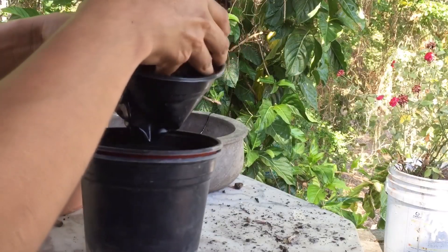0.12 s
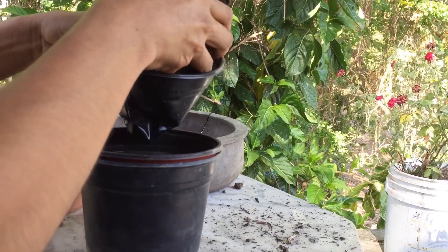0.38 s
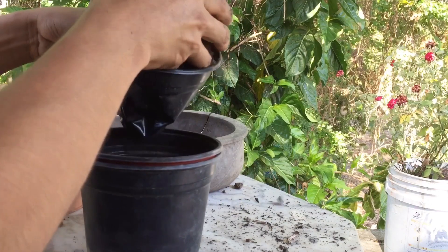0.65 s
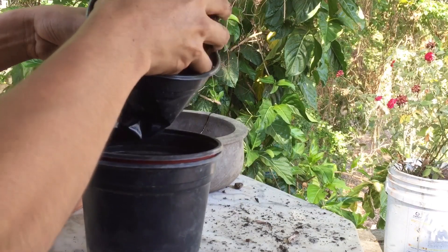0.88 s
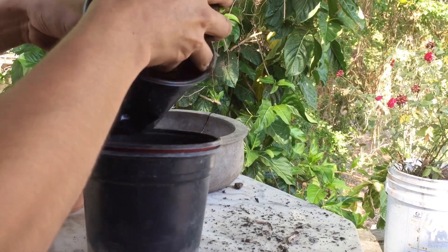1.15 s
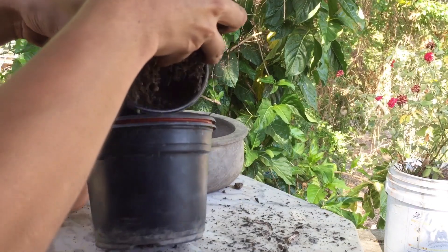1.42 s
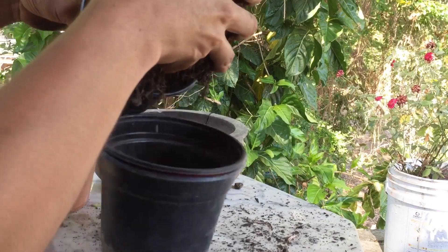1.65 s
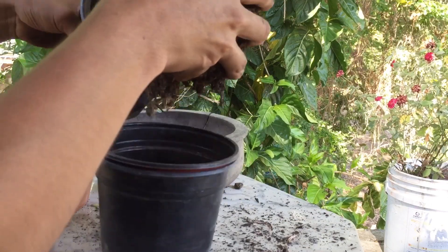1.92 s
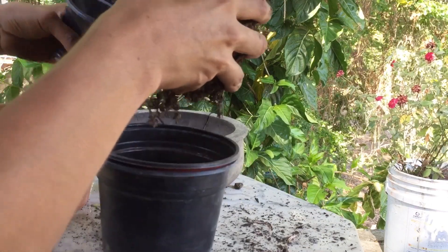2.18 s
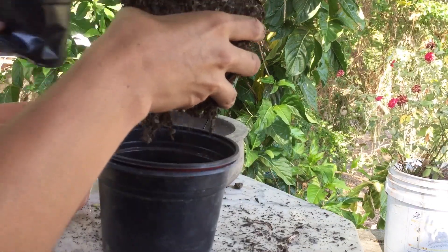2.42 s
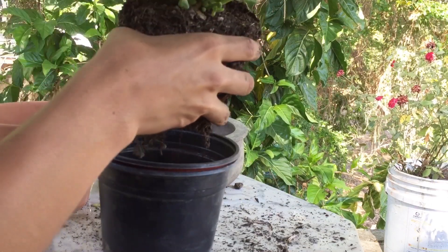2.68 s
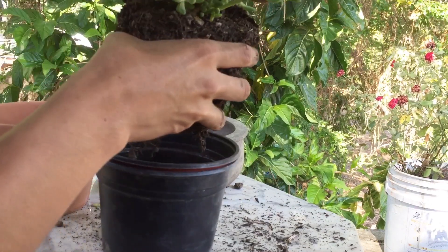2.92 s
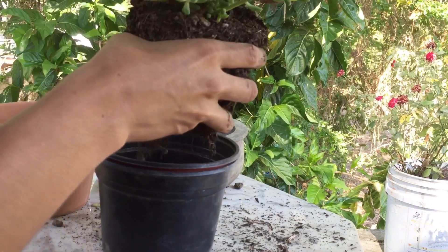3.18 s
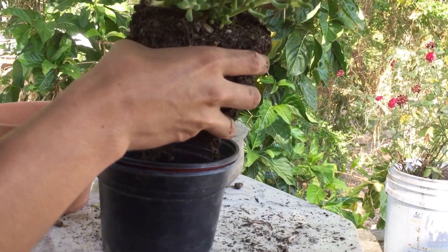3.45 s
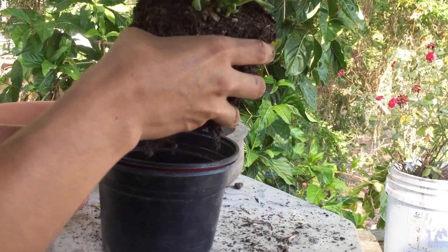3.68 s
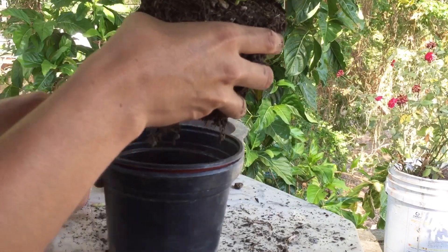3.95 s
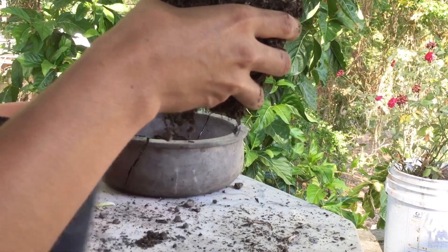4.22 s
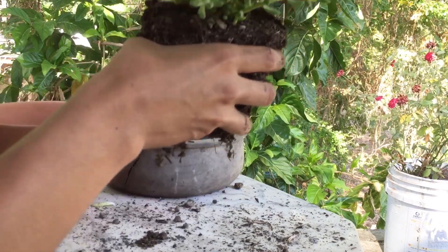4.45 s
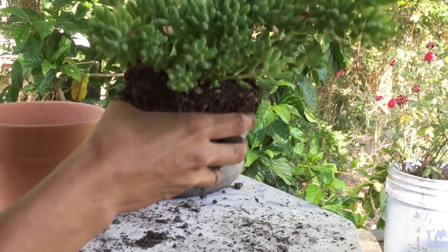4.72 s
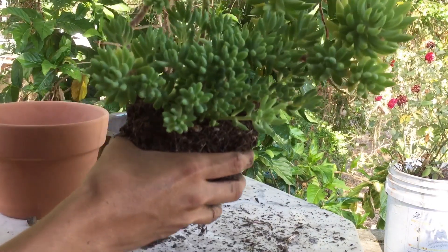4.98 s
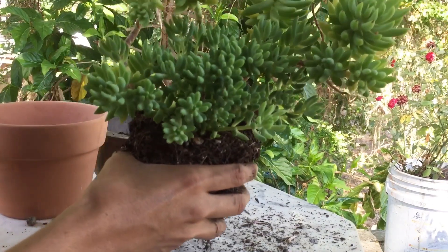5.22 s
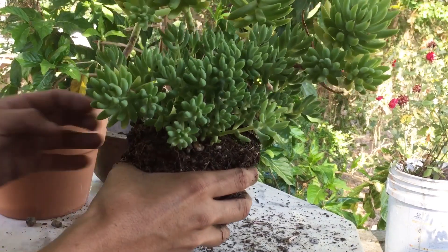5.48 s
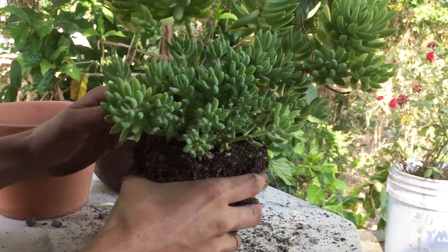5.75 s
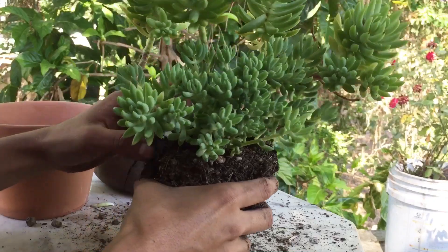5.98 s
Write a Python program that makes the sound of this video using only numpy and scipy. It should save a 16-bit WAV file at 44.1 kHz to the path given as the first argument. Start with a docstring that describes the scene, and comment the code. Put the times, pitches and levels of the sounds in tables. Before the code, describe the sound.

Close gritty soil rustle with sharp plastic pops, one loud crack, later a heavy pot thud, dragging, and soft clay knocks in a breezy garden.

```python
"""Soil and roots rustle at once, under a light breeze on the microphone and a quiet garden hiss.
Milliseconds later a thin plastic pot snaps: hands outdoors work a root ball out of it over a table.
Pots, one of them clay, knock and drag. Rustle, snaps and contacts are runs of tiny slips that ring
the modes of a body; breeze and garden are shaped noise, with single puffs of wind."""
import sys
import numpy as np
from scipy import signal
from scipy.fft import rfft, irfft
from scipy.io import wavfile
from scipy.ndimage import uniform_filter1d

SR = 44100
rng = np.random.default_rng(int(sys.argv[2]) if len(sys.argv) > 2 else 0)


def undo_db(level):
    """Turn decibels back into plain size, where 20 dB means ten times bigger."""
    steps = np.asarray(level, float) / 20
    return 10 ** steps


def unload_audio(sound):
    """Save the sound as a 16-bit wav file, at the path given as the first command line argument."""
    columns = np.transpose(np.atleast_2d(sound))
    # keep every value between -1 and 1, then stretch to whole-number steps
    steps = np.round(np.clip(columns, -1, 1) * 32767)
    wavfile.write(sys.argv[1], SR, steps.astype(np.int16))


N = 269892  # length [samples]


def in_time(rows):
    """Draw a table of (time [s], level [dB]) as one signal."""
    s, db = np.transpose(rows)
    return np.interp(np.arange(N) / SR, s, db)


def rms_one(x):
    """Scale to unit rms."""
    return x / np.sqrt(np.mean(x ** 2) + 1e-20)


def drift(rate_hz):
    """Slow random wander of unit rms: noise through two equal one-pole low-passes."""
    r = np.exp(-2 * np.pi * rate_hz / SR)
    settled = signal.lfilter([1], [1, -2 * r, r * r], rng.standard_normal(N + SR))[SR:]
    return rms_one(settled)


def band(x, low_hz, high_hz):
    """Band-pass."""
    return signal.sosfilt(signal.butter(2, [low_hz, high_hz], "band", fs=SR, output="sos"), x)


def ring(force, hz, t60):
    """One mode driven by a force, falling 60 dB in t60 seconds."""
    r, w = undo_db(-60 / (t60 * SR)), 2 * np.pi * min(hz, SR / 2.2) / SR
    return signal.lfilter([0, np.sin(w)], [1, -2 * r * np.cos(w), r * r], force)


def add(out, s, x):
    """Mix a short sound in at a moment."""
    i = max(round(s * SR), 0)
    out[i:i + len(x)] += x[:N - i]


# low rumble of the gusts on the microphone: (time [s], rms level [dB])
GUSTS = [(0.0, -59.5), (0.83, -56), (1.28, -55.5), (1.7, -60.5), (1.92, -66), (2.57, -67), (3.2, -58),
         (3.32, -57.5), (4.23, -61.5), (4.55, -54.5), (4.84, -62), (5.03, -72.5), (5.35, -72.5),
         (6.12, -60.5)]
# murmur of smaller, faster eddies: (time [s], rms level [dB])
SMALL_EDDIES = [(0.0, -65), (0.12, -64), (0.46, -61), (1.07, -59), (1.19, -51.5), (1.4, -57), (1.92, -60),
                (2.16, -60), (2.42, -55), (2.54, -61.5), (3.17, -62), (3.46, -65), (3.72, -65.5),
                (3.95, -58), (4.07, -57.5), (4.43, -52.5), (4.55, -65), (4.89, -62), (5.01, -57.5),
                (5.51, -69), (5.81, -54.5), (6.12, -58)]
# single eddies striking the microphone: (time [s], approximate peak [dB])
SINGLE_PUFFS = [(0.552, -37), (3.235, -39.5), (3.858, -39.5), (4.377, -37), (4.488, -31), (4.547, -31),
                (4.624, -40), (5.063, -44)]


def breeze():
    """Lumpy eddies at the microphone port; single puffs ring its low resonance."""
    rumble = rms_one(band(rng.standard_normal(N), 53.0, 73.2) * undo_db(2.4 * drift(3.8)))
    # each size of eddy comes and goes by itself, so the murmur wanders in pitch
    murmur = 0
    for hz in np.geomspace(140.0, 340.0, 6):
        eddy = rms_one(ring(rng.standard_normal(N), hz, 18 / hz))
        murmur = murmur + eddy * undo_db(7 * drift(4) - 3.0 * np.log2(hz / 150))
    push = np.zeros(N)
    for s, db in SINGLE_PUFFS:
        add(push, s, undo_db(db) * np.hanning(260) / 100)
    puffs = ring(push, 66, .08)
    return undo_db(in_time(GUSTS)) * rumble + undo_db(in_time(SMALL_EDDIES)) * rms_one(murmur) + puffs


# colour of the garden hiss: (frequency [Hz], relative level per Hz [dB])
GARDEN_COLOUR = [(18, -40.5), (30, -0.5), (76, 7), (200, -4.5), (455, -10), (625, -2.5), (752, -9),
                 (1030, -8.5), (3970, -22), (4900, -22), (8990, -26.5), (15200, -29), (16500, -46.5)]
GARDEN_DB = -61  # rms


def garden():
    """Distant leaves, traffic and microphone hiss: steady coloured noise."""
    hz, db = np.transpose(GARDEN_COLOUR)
    colour = undo_db(np.interp(np.log(np.fft.rfftfreq(N, 1 / SR) + 1), np.log(hz), db))
    return undo_db(GARDEN_DB) * rms_one(irfft(rfft(rng.standard_normal(N)) * colour, N))


# soil and roots rub in strokes:
# (start time [s], length [s], starting level [dB], grittiness moved from dull to bright [dB])
RUB_STROKES = [(0.0, 0.16, -54.5, -3), (0.184, 0.13, -66.5, 0), (0.261, 0.17, -67, 4.5),
               (0.438, 0.041, -76, 6), (0.494, 0.18, -60.5, -1), (0.679, 0.22, -60, -5.5),
               (0.923, 0.32, -63, -2), (1.17, 0.18, -52.5, -5), (1.349, 0.29, -55.5, 1),
               (1.647, 0.15, -58, -5), (1.817, 0.16, -54, -2), (2.027, 0.085, -59.5, -4),
               (2.166, 0.6, -76.5, 6), (2.462, 0.12, -63, 6), (2.566, 0.12, -60, 4),
               (2.721, 0.12, -63.5, -4), (2.912, 0.6, -80, 9), (3.428, 0.061, -58, -5),
               (3.523, 0.12, -52.5, -5.5), (3.642, 0.053, -73, 1), (3.742, 0.18, -79.5, 7),
               (4.038, 0.2, -57, -9), (4.249, 0.12, -62, -2), (4.39, 0.44, -77, 0),
               (4.861, 0.092, -62.5, -11), (4.972, 0.52, -75.5, -10), (5.494, 0.25, -67, -7),
               (5.763, 0.43, -82, 7.5)]
STROKE_ATTACK_S, STROKE_RELEASE_S, STROKE_SWELL_DB_PER_S = 0.0019, 0.011, 7


def strokes(grit_share):
    """Each stroke sets in, swells a little and dies away; grit moves a part up or down."""
    t, out = np.arange(N) / SR, np.zeros(N)
    for s, length, db, grit_db in RUB_STROKES:
        i, j = round(max(s, 0) * SR), round((s + length + .2) * SR)
        since = t[i:j] - s
        attack = np.clip(since / STROKE_ATTACK_S, 0, 1)
        release = np.exp(-np.maximum(since - length, 0) / STROKE_RELEASE_S)
        level_db = db + grit_share * grit_db + STROKE_SWELL_DB_PER_S * since
        out[i:j] += attack * release * undo_db(level_db)
    return out


# modes of the thin wall in hollow, middle and bright groups, each row:
# (frequency [Hz], relative level [dB], t60 before the fingers damp it [s])
WALL_MODES = [
    [(659, 3.5, 0.15), (903, -1, 0.05), (1100, 1, 0.07)],
    [(1500, 3.5, 0.023), (1900, 8.5, 0.078), (2453, 17, 0.0071), (3075, 11.5, 0.035), (3820, 13.5, 0.012),
     (4300, 3, 0.024)],
    [(5730, 1, 0.0015), (7030, -7, 0.0023), (8750, -5.5, 0.0029), (9530, -16.5, 0.0097),
     (11320, -13.5, 0.01), (13120, -8, 0.0015), (13700, -9.5, 0.0013)],
]
# fingers on the wall cut the rings short, one entry a group: (longest t60 [s])
LONGEST_RINGS = [.035, .011, .006]
RUSTLE_DULL_DB, RUSTLE_BRIGHT_DB = -9.5, -3  # against the middle part, before grit
BEND_SPREAD = .09  # share by which a bent wall shifts a mode up or down


def rustle(per_s=2000, size_db=5.0, clump_db=3.3, smooth=.3, shared_per_s=140):
    """Crumbs slip in clumps over a faint rub and ring wall modes, each hopping among three bent pitches."""
    clumps, out = drift(29), 0
    # larger crumbs tick every mode at once
    shared = rng.random(N) < shared_per_s * undo_db(clump_db * clumps) / SR
    levels = [undo_db(RUSTLE_DULL_DB) * strokes(-0.86), strokes(0), undo_db(RUSTLE_BRIGHT_DB) * strokes(0.49)]
    for modes, level, low_hz, longest in zip(WALL_MODES, levels, [380, 1100, 4200], LONGEST_RINGS):
        local_db = clump_db * np.clip(1.5 * clumps + 0.67 * drift(45), -2, 2)
        rung = 0
        for hz, db, t60 in modes:
            born = rng.random(N) < per_s * undo_db(local_db) / SR
            crumb_size = undo_db(size_db * np.minimum(rng.exponential(1, N), 4))
            crumbs = (born + 2 * shared) * crumb_size
            rub = smooth * rng.standard_normal(N) * undo_db(local_db)
            force = rms_one(crumbs - crumbs.mean()) + rub
            shape = np.clip(np.round(drift(12)), -1, 1)
            for k in (-1, 0, 1):
                bent_hz = hz * (1 + BEND_SPREAD * k)
                # the tiny offset keeps an idle filter off denormal numbers
                rung = rung + undo_db(db) * ring(force * (shape == k) + 1e-18, bent_hz, min(t60, longest))
        out = out + level * rms_one(band(rung, low_hz, 14000))
    return out


LEAD_DB, LEAD_MS = -21, 5  # creak for a rise of 1 ms; abrupt releases give less warning
TRAIL_DB, TRAIL_MS = -20, 8.0  # time constant of the last slips
DRY_DB = -16.5  # the slips heard directly, against the ringing modes


def blow(modes, rise_ms, fall_ms, low_hz, detune, spread_db, grit, dry, kick, size):
    """A faint creak leads into micro-slips that swell, die and trail off, ringing the modes; peak 1."""
    ms = np.arange(size) / SR * 1000 - LEAD_MS
    late = np.maximum(ms - rise_ms, 0)
    swell = np.clip(ms / max(rise_ms, 1e-3), 0, 1) ** 2
    lead = undo_db(LEAD_DB) * min(rise_ms, 1.5) ** 2 * (1 + ms / LEAD_MS) * (ms < rise_ms)
    fall = np.exp(-late / max(fall_ms, 1e-2))
    trail = undo_db(TRAIL_DB) * np.exp(-late / TRAIL_MS)
    slips, roughness = rng.standard_normal((2, size))
    # slips come in broken rattles
    lumps = np.interp(np.arange(size), np.arange(0, size, 128), roughness[::128])
    force = (lead + swell * (fall + trail)) * slips * np.exp(grit * (roughness + lumps))
    force[np.argmax(ms >= rise_ms)] += kick
    rung = 0
    for hz, db, t60 in modes:
        level_chance, pitch_chance = rng.standard_normal(2)
        rung = rung + undo_db(db + spread_db * level_chance) * ring(force, hz * (1 + detune * pitch_chance), t60)
    direct = band(force, .8 * modes[0][0], min(1.25 * modes[-1][0], SR / 2.5))
    x = rms_one(rung) + dry * undo_db(DRY_DB) * rms_one(direct)
    x = band(x, low_hz, 12950)  # a small body radiates little below its lowest mode
    return x / np.abs(x).max()


# buckling of the thin wall: (time [s], crack peak level [dB], crack pitch [Hz],
# bright part against the crack [dB], tearing time [ms])
WALL_SNAPS = [(0.0022, -19.5, 2560, -5.5, 1.8), (0.01, -44, 1950, -12, 1.3), (0.0176, -14, 2180, -45, 1.9),
              (0.04, -34.5, 2130, -5, 2.8), (0.0597, -31.5, 1830, -11, 2.6), (0.074, -49, 3000, -6, 1.1),
              (0.0947, -38, 2550, -16, 1.1), (0.123, -32, 2150, -2, 2.2), (0.1462, -19, 2740, -5.5, 2.5),
              (0.167, -36.5, 2080, -20, 3.1), (0.267, -43.5, 4100, 11, 0.35), (0.303, -27, 2230, -29, 0.8),
              (0.323, -48.5, 2440, 12.5, 1.2), (0.33, -44, 2450, -1, 4.5), (0.404, -50.5, 4260, 8, 1.4),
              (0.417, -45.5, 2350, -9, 2.9), (0.5077, -40.5, 3630, 0, 1.5), (0.5482, -28, 2200, -13, 0.72),
              (0.5685, -33, 2550, -10, 3.7), (0.5894, -15.5, 1500, 1, 2.43),
              (0.6028, -19.5, 2160, -26, 1.5), (0.632, -37, 4000, -2, 1.2), (0.753, -40.5, 2380, -3, 1.8),
              (0.7708, -30, 1610, 4, 2.7), (0.7963, -30.5, 2200, -9, 5.8), (0.815, -46.5, 1380, -25, 3.2),
              (0.8294, -39.5, 3650, 8.5, 1.55), (0.856, -42, 2180, -19, 2.5),
              (0.883, -35.5, 1900, -25, 4.3), (0.966, -53, 3600, 7, 1.4), (1.035, -48, 4220, 2, 1.5),
              (1.054, -34, 2880, -19, 1.1), (1.0949, -35, 3300, -35, 0.71), (1.1517, -4.5, 2000, -38, 1.44),
              (1.189, -20, 2570, -5, 3), (1.2057, -28, 1900, 9.5, 1.86), (1.226, -38, 3910, 5.5, 1.5),
              (1.283, -44, 1500, -20, 8.5), (1.316, -44, 1500, -6, 5.9), (1.3346, -34.5, 2450, 7.5, 0.87),
              (1.378, -42, 2400, 1, 1.5), (1.399, -47, 2300, -9, 1.2), (1.4127, -29, 2050, -23, 0.61),
              (1.436, -39, 2400, -6, 2.6), (1.466, -36, 2500, -12, 1.6), (1.479, -32.5, 3000, -1, 3.7),
              (1.485, -32, 3000, -15, 1.5), (1.493, -37.5, 3000, -1.5, 2.2),
              (1.5044, -37.5, 1690, -10, 4.2), (1.531, -34, 3100, 2, 1.7), (1.5439, -32.5, 2020, 9, 1.8),
              (1.5582, -28.5, 2900, -16, 1.4), (1.5718, -30, 2260, 0.5, 5.4), (1.6, -34, 2470, -6, 2.4),
              (1.6096, -30.5, 2900, -7, 6.7), (1.6217, -32.5, 4120, 3, 1.9), (1.629, -31, 3200, -22, 3),
              (1.707, -34, 2780, -3, 2.1), (1.743, -29, 2550, -3.5, 5.2), (1.7513, -29, 2550, 0.5, 6.7),
              (1.8083, -41, 1540, -3, 9), (1.8452, -21.5, 2420, -13, 4.04), (1.8835, -34, 2450, -5, 5.9),
              (1.9124, -30, 2550, -8, 3.7), (1.9515, -34, 2360, -4, 3.7), (1.9595, -23, 2070, -3, 2.23),
              (2.0471, -24, 2160, -37, 2.9), (2.0573, -40, 1500, -25, 4.3), (2.1021, -37, 1740, -4, 2.4),
              (2.152, -38.5, 3930, 0.5, 0.96), (2.1794, -39, 2820, -5, 1), (2.4044, -55.5, 3060, 4, 1.5),
              (2.473, -45, 3800, 5, 1.8), (2.482, -22, 3810, -3.5, 4.6), (2.492, -28, 3740, -2, 1.9),
              (2.5127, -14, 3260, 3.5, 2.33), (2.583, -42.5, 2760, 3, 6.5), (2.598, -45, 3530, 9, 3.2),
              (2.6301, -35, 4000, -0.5, 5.4), (2.653, -35, 2300, -4, 2.3), (2.658, -36.5, 2790, 2.5, 3.2),
              (2.673, -51, 2400, 11, 2.9), (2.7802, -39.5, 2750, 1, 0.64), (2.915, -60.5, 2534, 13, 2.25),
              (4.0138, -52.5, 2400, 7.5, 1.9), (4.0682, -27.5, 2200, -27, 3.3), (4.0897, -33.5, 2400, 2, 4),
              (4.0939, -30.5, 3940, -1, 2), (4.1078, -33, 4000, -2, 0.97), (4.1223, -30.5, 3450, -4.5, 5.6),
              (4.1462, -32, 2400, -37, 4.9), (4.1755, -39, 3500, -14, 2.7), (4.1977, -32, 3780, 8.5, 2.7),
              (4.2121, -26, 3430, 2.5, 3.8), (4.2291, -33.5, 3300, 0, 1.2), (4.279, -52, 3300, 2, 2.3),
              (4.3013, -29, 2930, -6, 10), (4.309, -34, 2400, -1, 3.4), (4.3118, -29.5, 2140, 0, 2),
              (4.3274, -24, 2820, -8, 1.6), (4.3305, -28.5, 3300, -2, 3), (4.7425, -54.5, 1500, 12, 4.1),
              (4.9693, -46, 3070, -8, 9), (5.0157, -45, 3300, -13, 1.1), (5.109, -52, 2510, -18, 2.9)]
# a low, slowly tearing patch is large and moves the whole wall: hollow part against the crack
HOLLOW_DB, HOLLOW_DB_PER_OCTAVE, HOLLOW_DB_PER_DOUBLED_TEARING = -20, -26.5, 5.5
PATCH_DB, PATCH_CYCLES = 6, 38  # the buckling patch itself rings briefly at the crack pitch
# jolt at the top of the swell for a crack of -25 dB; share of the crack's level [dB] it follows
KICK, KICK_FOLLOWS = 1.1, .9


def snaps():
    """The bent wall shifts its modes; the patch that buckles favours those near its own pitch."""
    out = np.zeros(N)
    hollow, middle, bright = [[(hz, db, min(t60, longest)) for hz, db, t60 in group]
                              for group, longest in zip(WALL_MODES, LONGEST_RINGS)]
    for s, crack_db, crack_hz, bright_db, tearing_ms in WALL_SNAPS:
        crack = [(hz, db - 13 * abs(np.log2(hz / crack_hz)), t60) for hz, db, t60 in middle]
        crack.append((crack_hz, PATCH_DB, PATCH_CYCLES / crack_hz))
        crack.sort()
        hollow_db = (HOLLOW_DB + HOLLOW_DB_PER_OCTAVE * np.log2(max(crack_hz, 2000) / 2500)
                     + HOLLOW_DB_PER_DOUBLED_TEARING * np.log2(max(tearing_ms, .2) / 2))
        kick = KICK * undo_db(KICK_FOLLOWS * (crack_db + 25))
        # sharp ticks reach the top octave, dull cracks fall off early
        tilt_db = np.clip(0.6 * bright_db - 0.5, -12, 6)
        top = [(hz, db + tilt_db * np.log2(hz / 8000), t60) for hz, db, t60 in bright]
        parts = [(hollow, hollow_db, 420), (crack, 0, 1100), (top, bright_db, 4200)]
        for modes, db, low_hz in parts:
            x = blow(modes, .2 + .2 * tearing_ms, .5 * tearing_ms, low_hz, detune=.045, spread_db=2.5,
                     grit=.4, dry=1, kick=kick, size=2048)
            add(out, s - LEAD_MS / 1000, undo_db(crack_db + db) * x)
    return out


# modes of the thick pot: (frequency [Hz], relative level [dB], t60 before the table damps it [s])
POT_MODES = [(251, -16.5, 0.037), (450, -10, 0.025), (720, -4, 0.022), (940, -1.5, 0.022), (1230, -6, 0.06),
             (1600, 0.5, 0.0059), (2070, -4, 0.012), (2550, -6.5, 0.0051), (3390, -6.5, 0.003),
             (4500, -34.5, 0.0012), (5700, -24.5, 0.0012), (8900, -45.5, 0.00071)]
# modes of the clay pot: (frequency [Hz], relative level [dB], t60 before the table damps it [s])
CLAY_MODES = [(194, -4.5, 0.041), (306, -11, 0.057), (550, -1.5, 0.028), (784, 5, 0.025),
              (970, -4.5, 0.034), (1230, -1, 0.029), (1800, -4, 0.018), (2200, -7, 0.017), (2530, 0, 0.014),
              (3100, -3, 0.016), (3300, -13.5, 0.025), (4000, -13.5, 0.022), (5200, -25, 0.0084)]
# the thick pot knocks on the table: (time [s], rms level at its loudest [dB], fall time constant [ms],
# tilt [dB per octave], favoured pitch [Hz])
POT_KNOCKS = [(0.016, -39.5, 8.5, 3.5, 610), (0.688, -50, 5.1, -1, 696), (1.153, -27.5, 6.5, 5, 560),
              (2.188, -45, 34, -12, 820), (2.77, -55, 82, -3.5, 450), (3.4362, -23, 6.2, -4.5, 450),
              (3.446, -37.5, 11, 14, 450), (3.471, -37.5, 9.8, 1, 450), (3.485, -42, 18, 5, 940),
              (3.509, -44, 26, -2.5, 450), (3.556, -38.5, 24, 6, 940), (3.582, -37.5, 38, 14, 940),
              (3.6, -35, 27, 3, 720), (3.652, -49, 16, 5, 2070), (4.514, -51.5, 13, 7, 2020),
              (4.571, -59, 12, -10, 1600), (4.642, -57.5, 9.2, -8, 1600), (4.668, -56, 7.2, -1, 720),
              (4.776, -56.5, 40, -2, 1060), (5.278, -57, 3, -7, 1230)]
# the clay pot knocks on the table: (time [s], rms level at its loudest [dB], fall time constant [ms],
# tilt [dB per octave], favoured pitch [Hz])
CLAY_KNOCKS = [(4.882, -33.5, 11, 11.5, 970), (5.183, -36, 13.3, -1, 194), (5.516, -37, 16, 6.5, 550),
               (5.627, -40.5, 10, 5.5, 1800)]
# the thick pot is dragged or brushed: (time [s], rms level at its loudest [dB],
# fall time constant [ms], tilt [dB per octave], favoured pitch [Hz])
POT_DRAGS = [(2.681, -50, 9, 13, 910), (3.264, -55.5, 12, -1, 720), (3.544, -39.5, 31, 10, 2070),
             (3.576, -53, 23, 17, 895), (3.603, -35.5, 19.5, 7.5, 1230), (3.615, -36, 19, 8.5, 1230),
             (3.675, -49.5, 15, -7, 724), (4.046, -42.5, 24, 32, 2100), (4.742, -54, 44, -13, 1230),
             (4.763, -55, 39, -7, 720), (5.297, -58, 8.5, 18, 2090), (5.346, -50, 17, 1, 720),
             (5.377, -54.5, 21, -8, 2070), (5.534, -47.5, 5.8, -5, 1230), (5.58, -46.5, 35, 14.5, 1230),
             (5.671, -46.5, 22, 25, 2070)]
KNOCK_RISE_MS, DRAG_RISE_PER_FALL = 1.757, 0.51
KNOCK_KICK, KNOCK_GRIT, DRAG_GRIT = 3.0, .3, .45  # jolt of a knock; unevenness of the slips
CONTACT_DRY_SHARE, FAVOUR_DB = 0.42, 11.5
LONGEST_RING_CYCLES = 75  # the table damps the pots


def knocks():
    """Rigid pots keep their pitches, the spot touched favours one; knocks start fast, drags swell."""
    out = np.zeros(N)
    contacts = [(POT_MODES, KNOCK_RISE_MS, KNOCK_KICK, KNOCK_GRIT, *row) for row in POT_KNOCKS]
    contacts += [(CLAY_MODES, KNOCK_RISE_MS, KNOCK_KICK, KNOCK_GRIT, *row) for row in CLAY_KNOCKS]
    contacts += [(POT_MODES, DRAG_RISE_PER_FALL * row[2], 0, DRAG_GRIT, *row) for row in POT_DRAGS]
    for body, rise_ms, kick, grit, s, db, fall_ms, tilt_db, favoured_hz in contacts:
        modes = []
        for hz, level_db, t60 in body:
            favour_db = FAVOUR_DB * np.exp(-(np.log2(hz / favoured_hz) / .3) ** 2)
            touched_db = level_db + tilt_db * np.log2(hz / 500) + favour_db
            modes.append((hz, touched_db, min(t60, LONGEST_RING_CYCLES / hz)))
        x = blow(modes, rise_ms, fall_ms, 170, detune=.015, spread_db=2.0,
                 grit=grit, dry=CONTACT_DRY_SHARE, kick=kick, size=8192)
        loudest_rms = np.sqrt(uniform_filter1d(x ** 2, size=300).max())
        add(out, s - LEAD_MS / 1000, undo_db(db) * x / loudest_rms)
    return band(out, 150, 19000)  # the pots are too small to radiate bass


def scene():
    """All sources, close and in open air."""
    return (breeze() + garden() + rustle() + snaps() + knocks())[None]


def band_limit(x):
    """A steep low-pass at the top of the band."""
    return signal.sosfilt(signal.butter(12, 16990, fs=SR, output="sos"), x)


def record(dry):
    """The top is cut steeply, then the microphone cuts the deepest bass."""
    top_cut = signal.sosfilt(signal.cheby2(12, 70, 17400, fs=SR, output="sos"), dry)
    mix = signal.sosfilt(signal.butter(5, 38, "high", fs=SR, output="sos"), top_cut)
    return band_limit(mix)


dry = scene()
out = record(dry)
unload_audio(out)
```